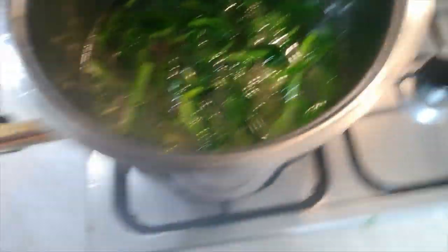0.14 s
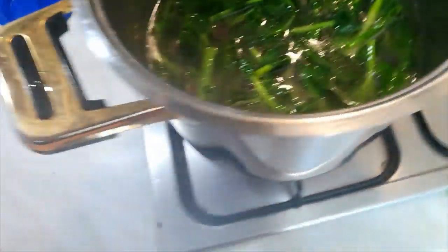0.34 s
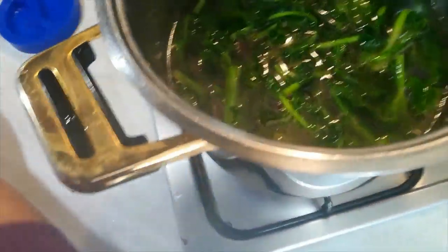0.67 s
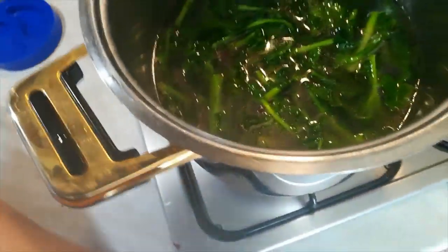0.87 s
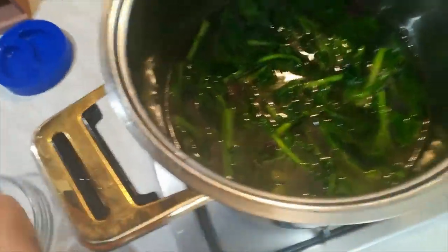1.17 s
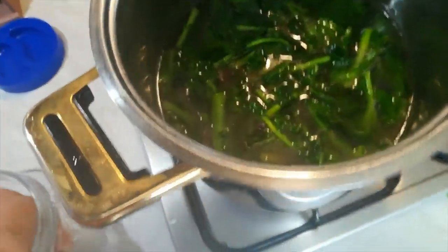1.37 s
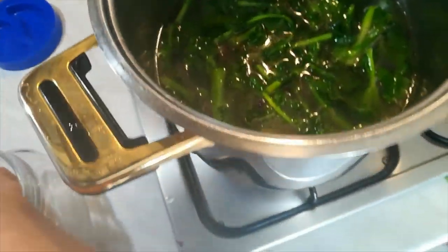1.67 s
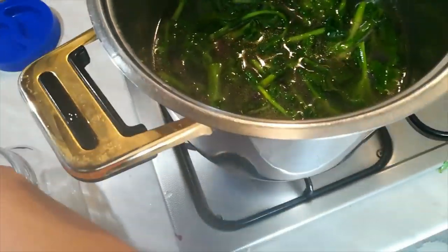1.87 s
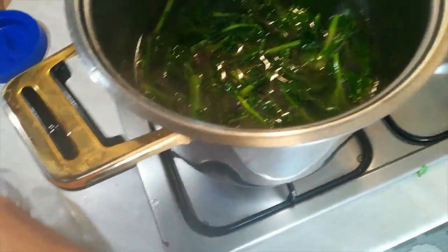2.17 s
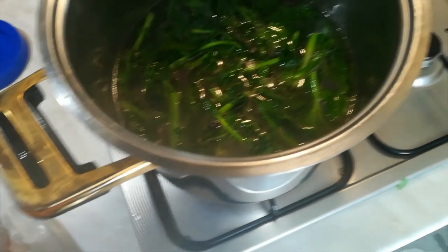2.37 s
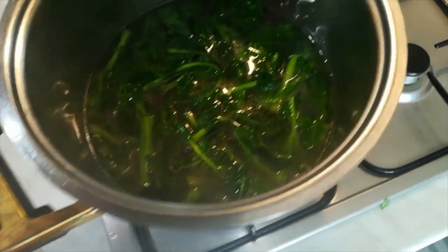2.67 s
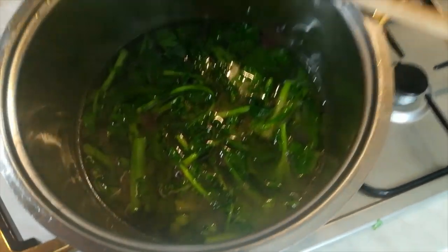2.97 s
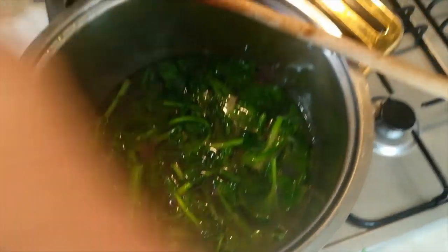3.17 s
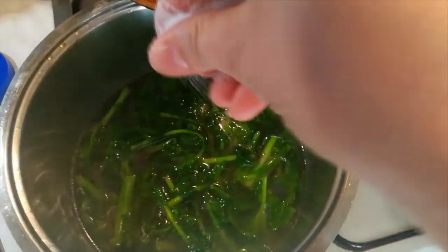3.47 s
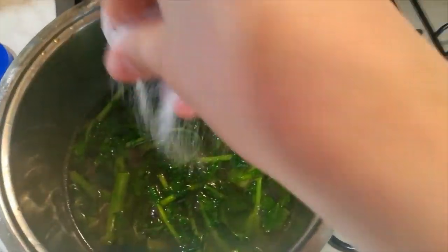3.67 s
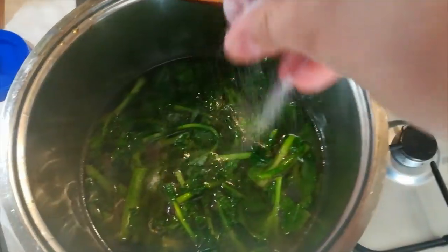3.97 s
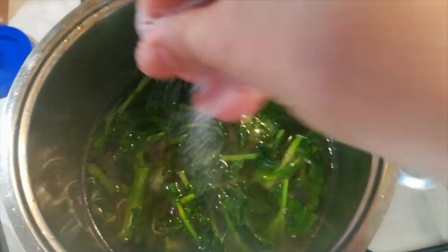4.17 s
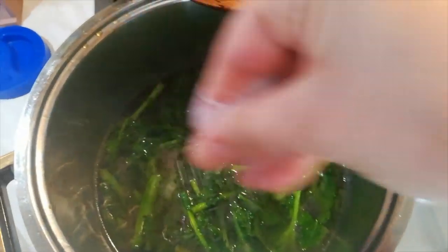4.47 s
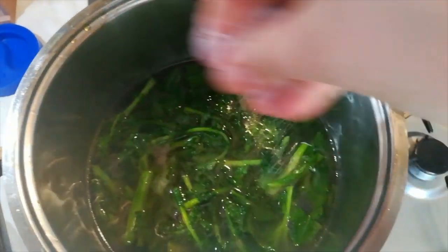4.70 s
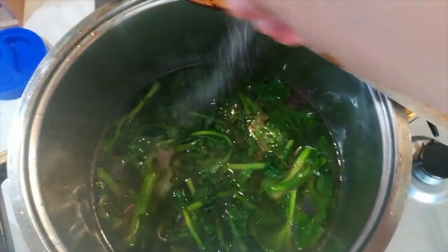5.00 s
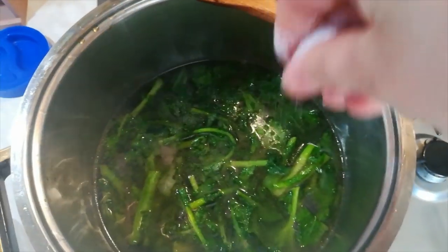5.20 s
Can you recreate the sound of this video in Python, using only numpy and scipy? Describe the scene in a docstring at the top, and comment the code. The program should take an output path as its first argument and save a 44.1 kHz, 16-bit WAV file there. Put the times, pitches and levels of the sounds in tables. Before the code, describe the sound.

A plastic lid snaps off, a jar knocks and slides on a hollow worktop, then fingers rub salt in short, crisp strokes.

```python
"""A kitchen, close to a pot of broth. A plastic lid snaps and scrapes off, then a salt jar is knocked
and slid about on a hollow worktop: the worktop rings and rumbles, the jar hisses and squeaks.
Fingers rub salt over the pot in short strokes: crystals grind and crunch, coloured by the hollow
of the hand. Two microphone ports hear it, the left one earlier and brighter, over faint room noise."""
import sys
import numpy as np
from scipy import signal
from scipy.fft import rfft, irfft, next_fast_len
from scipy.io import wavfile
from scipy.ndimage import uniform_filter1d

SR = 44100
rng = np.random.default_rng(int(sys.argv[2]) if len(sys.argv) > 2 else 0)


def pcm_store(signal):
    """Save signal as 16-bit PCM."""
    levels = np.round(np.clip(np.atleast_2d(signal), -1, 1) * 32767)
    wavfile.write(sys.argv[1], SR, levels.astype(np.int16).T)


N = 235670


def amp(db):
    """Decibels to gain."""
    return 10 ** (np.asarray(db) / 20)


def unit(pair):
    """A stereo pair scaled so that its mid has rms 1."""
    return pair / np.sqrt(np.mean(pair.mean(0) ** 2) + 1e-30)


def along(points, hz):
    """Read a (frequency, value) curve on a log axis."""
    freqs, values = np.transpose(points)
    return np.interp(np.log(hz + 1), np.log(freqs + 1), values)


def filtered(x, response):
    """EQ x with a response given as a function of frequency."""
    n = x.shape[-1]
    size = next_fast_len(n + 8192)
    return irfft(rfft(x, size) * response(np.fft.rfftfreq(size, 1 / SR)), size)[..., :n]


def causal(x, gain, size=4096):
    """Minimum-phase EQ: nothing sounds ahead of a hit."""
    cepstrum = irfft(np.log(np.maximum(gain(np.fft.rfftfreq(size, 1 / SR)), 1e-6)))
    cepstrum[1:size // 2] *= 2
    cepstrum[size // 2 + 1:] = 0
    impulse = irfft(np.exp(rfft(cepstrum)))
    return signal.fftconvolve(x, impulse[None], axes=1)[:, :x.shape[1]]


def add(track, s, sound):
    """Mix a sound into the track at s seconds."""
    part = track[:, round(s * SR):][:, :sound.shape[1]]
    part += sound[:, :part.shape[1]]


# Close sounds, mono in the bass and wide on top: (frequency [Hz], left-right correlation)
CLOSE_IMAGE = [(60, 1), (150, 1), (350, 1), (600, 0.56), (950, .2), (1400, 0.22), (2100, 0.22), (4000, 0.1),
               (15000, .1)]
def ports(pair, pan, image=CLOSE_IMAGE):
    """Two unrelated signals become left and right, with width and pan set by frequency."""
    angle = lambda hz: np.arccos(np.clip(along(image, hz), -1, 1)) / 2
    mid, side = filtered(pair, lambda hz: np.array([np.cos(angle(hz)), np.sin(angle(hz))]))
    lean = lambda hz: amp(np.outer([.5, -.5], along(pan, hz)))
    stereo = np.array([mid + side, mid - side])
    return filtered(stereo, lambda hz: lean(hz) / np.linalg.norm(lean(hz), axis=0))


def leftward(db):
    """Left and right gains that differ by db and average 1."""
    return 2 * np.array([[amp(db)], [1]]) / (1 + amp(db))


def from_left(pair, lag_s=.00066):
    """The right port hears a close sound a little later."""
    return filtered(pair, lambda hz: np.exp(-2j * np.pi * np.outer([0, lag_s], hz)))


def coloured(pair, eq, pan, image=CLOSE_IMAGE):
    """A stereo texture of rms 1, shaped by this EQ."""
    return unit(ports(filtered(pair, lambda hz: amp(along(eq, hz))), pan, image))


def grains(per_s, spread_db, smooth):
    """Tiny slips at random moments and sizes, on a bed of even friction noise."""
    hit = rng.random(N) < per_s / SR
    size = amp(spread_db * np.minimum(rng.exponential(size=N), 3))
    return unit(hit * size * rng.standard_normal((2, N))) + smooth * rng.standard_normal((2, N))


def resonance(centre_hz, width_hz):
    """Friction grains ringing in one resonance whose centre may glide; stereo, rms 1."""
    carrier = np.exp(2j * np.pi * np.cumsum(centre_hz * np.ones(N)) / SR)
    slips = grains(per_s=3100, spread_db=0, smooth=1.0)
    lowpass = signal.butter(2, width_hz / 2, fs=SR)
    ring = (signal.lfilter(*lowpass, slips / carrier) * carrier).real
    return ring / ring.std()


def patchy(pair, depth_db):
    """Shifting contact and near reflections colour a rub in drifting patches."""
    bands = signal.stft(pair, nperseg=512)[2]
    drift = uniform_filter1d(rng.standard_normal(bands.shape[1:]), size=5, axis=0)  # across frequency
    drift = uniform_filter1d(drift, size=26, axis=1)  # across time
    return signal.istft(bands * amp(depth_db * drift / drift.std()), nperseg=512)[1][:, :N]


def stroke(s, length, rise, release_s):
    """Envelope of one rub: pressure builds over the share rise of its length, holds, then lets go."""
    t = np.arange(N) / SR - s
    build = np.sin(np.pi / 2 * np.clip(t / (rise * length), 0, 1))
    return build * np.exp(-np.clip((t - length) / release_s, 0, 20))


def strokes(rows, rise, release_s):
    """One envelope per level column of (time, length, level, ..) rows; overlaps add in power."""
    rows = np.array(rows)
    shapes = np.array([stroke(s, length, rise, release_s) for s, length in rows[:, :2]])
    return np.sqrt(amp(rows[:, 2:].T) ** 2 @ shapes ** 2)


def pressed(rub, grip, full_db, dull_hz):
    """A rub rides the grip envelope: a lighter grip is quieter and duller."""
    dull = filtered(rub, lambda hz: 1 / (1 + (hz / dull_hz) ** 4))
    bright = np.minimum(grip / amp(full_db), 1) ** .5
    return grip * (dull + bright * (rub - dull))


# Dark room tone: (frequency [Hz], gain [dB])
ROOM_EQ = [(15, -17), (25, -2), (107, -4.5), (179, -11.5), (216, -11.5), (255, -13), (414, -11.5),
           (587, -16.5), (637, -20.5), (769, -15.5), (1090, -16), (2660, -18), (6850, -23), (9990, -27.5),
           (15800, -30)]
# Its near-centred balance: (frequency [Hz], left over right [dB])
ROOM_PAN = [(400, -1), (2400, 4), (4400, -2.5), (8000, 2), (15000, -2)]
# The room's diffuse width: (frequency [Hz], left-right correlation)
ROOM_IMAGE = [(60, 0.097), (150, .92), (300, 0.32), (600, -0.51), (1400, -0.15), (15000, -0.25)]
def room_tone(level_db=-70):
    """A faint, steady bed of room noise."""
    return amp(level_db) * coloured(rng.standard_normal((2, N)), ROOM_EQ, ROOM_PAN, ROOM_IMAGE)


# Reverb decay: (frequency [Hz], t60 [s])
WALL_DECAY = [(150, 0.82), (1000, 0.34), (4000, 0.38), (12000, 0.93)]
def wall_reverb(send):
    """The hard walls answer after 10 ms, each frequency dying at its own speed."""
    hz, t, bands = signal.stft(rng.standard_normal((2, SR // 2)), SR, nperseg=256)
    tail = signal.istft(bands * amp(-60 * t / along(WALL_DECAY, hz)[:, None]), SR, nperseg=256)[1]
    tail = np.pad(tail / np.linalg.norm(tail[0]), ((0, 0), (SR // 100, 0)))
    return signal.fftconvolve(send, tail, axes=1)[:, :N]


# Arm gestures: (time [s], length [s], level [dB])
ARM_CUES = [(3.28, 0.21, -80), (3.4, 1.06, -76), (3.88, 0.22, -75.5), (4.86, 0.24, -70.5),
            (5.23, 0.11, -70.5)]
# Muffled rustle: (frequency [Hz], gain [dB])
ARM_EQ = [(18, -41), (30, -7), (87, 4.5), (278, -11), (338, -26), (412, -3.5), (662, -14), (1500, -12),
          (1950, -66), (3300, -120)]
# Placement of arm, hand and salt: (frequency [Hz], left over right [dB])
HAND_PAN = [(400, 0.78), (1300, 1.3), (2400, 17.5), (4400, 8.9), (8000, 4.5), (15000, 24)]
def arm_rustle():
    """The arm rustles softly as it moves over the pot."""
    motion, = strokes(ARM_CUES, rise=0.58, release_s=0.041)
    return motion * coloured(rng.standard_normal((2, N)), ARM_EQ, HAND_PAN)


# Drags on the rim: (time [s], length [s], level [dB])
DRAG_CUES = [(.14, 0.054, -56.5), (.185, 0.034, -39.5), (.215, 0.22, -47), (.49, 0.15, -62.5)]
# Plastic scrape: (frequency [Hz], gain [dB])
DRAG_EQ = [(88, -29), (150, -21), (340, -13.5), (405, -7.5), (622, -14.5), (713, -9), (955, -8.5),
           (1090, -2), (1360, -6), (2250, 0.5), (3020, -9), (7830, -10.5), (15800, -29.5)]
# Placement of the lid: (frequency [Hz], left over right [dB])
LID_PAN = [(350, 0.5), (700, 5.5), (1300, 9), (2400, 10.5), (4400, 1.5), (8000, 1.5), (15000, 14)]
def lid_drag():
    """The lid drags smoothly along the rim."""
    rub = coloured(rng.standard_normal((2, N)), DRAG_EQ, LID_PAN)
    grip, = strokes(DRAG_CUES, rise=.2, release_s=.03)
    return pressed(rub, grip, full_db=-52.5, dull_hz=7000)


# Lid clicks: (time [s], relative level [dB], t60 [s])
SNAP_CUES = [(0.14, -69.5, .03), (.152, -56.5, .03), (0.166, -58.5, .05), (0.1837, -25, 0.016),
             (0.1874, -30, 0.041), (0.224, -58, 0.025)]
# Bright plastic crack: (frequency [Hz], gain [dB])
SNAP_EQ = [(200, -35.5), (380, -16.5), (680, -31), (1000, -9), (1500, -8.5), (1830, 6), (2200, 2),
           (3200, -16), (4100, -6.5), (7000, -14), (8200, -2.5), (9500, -12), (15800, -29)]
def lid_snaps(strike_db=14, gain_db=8.5):
    """The lid catches, then snaps free: each click is a sharp release and a burst of chatter."""
    t, track = np.arange(SR // 4) / SR, np.zeros((2, N))
    for s, db, t60 in SNAP_CUES:
        burst = rng.standard_normal((2, len(t))) * amp(-60 * t / t60)
        burst[0, 0] += amp(strike_db)
        snap = causal(burst, lambda hz: amp(along(SNAP_EQ, hz)))
        add(track, s, amp(db) * snap / snap[:, :SR // 250].std())
    return amp(gain_db) * ports(track, LID_PAN)


# Thin squeaks: (time [s], length [s], level [dB], pitch [Hz])
SQUEAK_CUES = [(1.683, 0.026, -64.5, 3520), (1.69, 0.015, -69, 4840), (1.825, 0.089, -64, 4040),
               (1.85, 0.026, -67, 4450), (1.96, .12, -70, 4070), (2.182, 0.053, -69.5, 4120),
               (2.322, .018, -72.5, 4340)]
def jar_squeaks(octave_db=-5.5, width_hz=145):
    """Under a light push the jar's base sticks and sings briefly, with its octave."""
    track = np.zeros((2, N))
    for s, length, db, hz in SQUEAK_CUES:
        tone = resonance(hz, width_hz) + amp(octave_db) * resonance(2 * hz, width_hz)
        track += amp(db) * stroke(s, length, rise=0.47, release_s=0.027) * tone
    return leftward(db=9) * track


# Jar-on-worktop scrape: (frequency [Hz], gain [dB])
SLIDE_EQ = [(35, -49), (60, -22.5), (227, -3.5), (446, -0.5), (632, -4.5), (720, 3), (877, -4.5),
            (1100, -3), (1610, -2.5), (2330, -2), (3200, -16), (4200, -8.5), (5400, -20), (6800, -8.5),
            (8300, -14.5), (11000, -25), (15800, -34.5)]
# The jar's ring: (frequency [Hz], bandwidth [Hz], relative level [dB])
JAR_MODES = [(2200, 400, -6), (4110, 240, 0), (4500, 280, -5), (5600, 250, -13), (7400, 1200, -3),
             (8350, 550, -4)]
# Placement of the sliding jar, also used for the reverb: (frequency [Hz], left over right [dB])
JAR_PAN = [(250, 0.93), (700, 4.1), (1300, 5.7), (2400, 5.2), (4400, 1), (8000, 1.9), (15000, 15.5)]
def jar_slide(rumble, hiss, ring_db, patchy_db):
    """The jar's base scrapes: the worktop rumbles below, the jar's own resonances hiss above."""
    scrape = coloured(grains(per_s=4000, spread_db=2, smooth=1.2), SLIDE_EQ, JAR_PAN)
    lowpass = lambda hz: 1 / (1 + (hz / 3000) ** 8)
    modes = lambda hz: sum(amp(db) * 1j * hz * width / (centre ** 2 - hz ** 2 + 1j * hz * width)
                           for centre, width, db in JAR_MODES)
    ring = unit(ports(filtered(rng.standard_normal((2, N)), modes), JAR_PAN))
    grit = unit(filtered(scrape, lambda hz: 1 - lowpass(hz)))
    top = unit(patchy(grit + amp(ring_db) * ring, depth_db=1.5))
    body = unit(patchy(filtered(scrape, lowpass), patchy_db))
    return rumble * body + pressed(top, hiss, full_db=-46, dull_hz=9000)


# The jar tilts, rocks and shifts: (time [s], length [s], rumble [dB], hiss [dB])
NUDGE_CUES = [(.708, .065, -47, -53), (1.17, .43, -58.5, -70), (1.66, 0.11, -73, -64.5),
              (1.80, 0.13, -61.5, -60), (1.965, 0.13, -66, -62), (2.01, 0.16, -57.5, -73),
              (2.17, 0.07, -76, -66.5)]
def jar_nudges():
    """Light, short moves bring out the jar's ring."""
    rumble, hiss = strokes(NUDGE_CUES, rise=.35, release_s=0.038)
    return jar_slide(rumble, hiss, ring_db=-1.5, patchy_db=2.0)


def jar_push(start_s=0.69, length_s=0.58, rumble_db=-41.5, hiss_db=-44):
    """One long push speeds up and slows down; the hiss grows with speed faster than the rumble."""
    progress = np.clip((np.arange(N) / SR - start_s) / length_s, 0, 1)
    speed = np.abs(np.sin(np.pi * progress))
    rumble, hiss = amp(rumble_db) * speed ** 0.42, amp(hiss_db) * speed ** 1.1
    return jar_slide(rumble, hiss, ring_db=-10, patchy_db=4.0)


# The rattle of a hit: (frequency [Hz], gain [dB])
CLATTER_EQ = [(30, -33.5), (80, -2.5), (180, -7.5), (420, -4), (600, -7), (900, 1.5), (1250, -3.5),
              (1600, -5), (2200, 1), (2650, -12.5), (3150, -12.5), (5500, -14), (8000, -8), (11000, -19),
              (15000, -29)]
# The worktop's hollow ring: (frequency [Hz], relative level [dB], t60 [s])
WORKTOP_MODES = [(108, -19.5, 0.37), (148.8, -6, 0.36), (227, -1, 0.16), (250.2, -2, 0.25),
                 (306, -17.5, 0.34), (393, 2, 0.11), (440.5, 1.5, 0.16), (476.3, -6, 0.35),
                 (746.5, -2, 0.12), (788, -10.5, 0.31), (836, -8, 0.235), (900, -6.5, .19), (958, -8, 0.27),
                 (1039.6, -3.5, 0.11), (1090.4, -7, .15), (1243, 0.5, 0.15), (1385, -1.5, 0.061),
                 (1483, -0.5, 0.078), (1720, -15, 0.091), (1980, -5, 0.12), (2134, -4.5, 0.14),
                 (2620, -6, 0.14), (4030, -5.5, 0.15)]
# Placement of the hits: (frequency [Hz], left over right [dB])
WORKTOP_PAN = [(100, 0.5), (250, 3), (450, 2), (1000, 9), (2300, 13.5), (4400, 2.5), (8000, 4), (15000, 7)]
def knock(thump_db, corner_hz, rattle_s, spot_hz,
          ring_db=-20, spot_db=8, strike_db=24, clatter_t60=0.086, tick=.012):
    """One hit: a sharp attack, a short rattle and the worktop's modes; a soft contact dulls them all."""
    t = np.arange(SR * 3 // 4) / SR
    clatter = rng.standard_normal((2, len(t))) * amp(-60 * np.maximum(t - rattle_s, 0) / clatter_t60)
    clatter[0, 0] += amp(strike_db)
    clatter = causal(clatter, lambda hz: amp(along(CLATTER_EQ, hz)))
    ring = np.zeros_like(clatter)
    for hz, db, t60 in WORKTOP_MODES:
        favour_db = spot_db * np.exp(-(np.log(hz / spot_hz) / 0.24) ** 2)
        phase = rng.uniform(0, 2 * np.pi, (2, 1))
        # the loosely seated jar blurs each mode's pitch
        blur = np.cumsum(rng.standard_normal(len(t))) * np.sqrt(hz / SR / 20)
        envelope = amp(db + favour_db + rng.normal(0, 1.0) - 60 * t / t60)
        ring += envelope * np.sin(2 * np.pi * hz * t + phase + blur)
    body = clatter + amp(ring_db) * ring * (1 - np.exp(-t / 0.0016))
    contact = lambda hz: tick + 1 / (1 + (hz / corner_hz) ** 2.58)  # even a soft hit keeps a tick
    low_shelf = lambda hz: amp(thump_db / (1 + (hz / 300) ** 4))
    hit = causal(ports(body, WORKTOP_PAN), lambda hz: contact(hz) * low_shelf(hz))
    return hit / hit[:, :SR // 40].mean(0).std()


# Jar hits: (time [s], level [dB], thump [dB], contact cutoff [Hz], rattle [s],
# pitch favoured by the struck spot [Hz])
KNOCK_CUES = [(0.647, -45.5, 10, 256, 0.011, 215), (0.6604, -35.5, 2, 1900, 0.014, 725),
              (0.745, -36.5, -4.5, 2260, 0.019, 437), (0.7755, -20, -7.5, 2400, 0.022, 870),
              (0.803, -31, 4.5, 1102, 0.0095, 230), (0.833, -36.5, -6, 1557, 0.016, 228.5),
              (1.226, -40.5, 10.5, 334, 0.0067, 150), (1.237, -38.5, -8, 920, 0.035, 467),
              (1.3245, -28, -4.5, 940, 0.021, 475), (1.4350, -22, -5, 2500, 0.009, 1340),
              (1.4483, -34, -0.5, 900, 0.0021, 380), (1.498, -46, 2, 1800, 0.057, 890),
              (1.601, -45, 1, 830, 0.016, 384), (1.655, -90, 15, 589, 0.0048, 152),
              (1.791, -37, -2, 1740, 0.011, 430)]
def jar_knocks():
    """The jar bumps on the hollow worktop."""
    track = np.zeros((2, N))
    for s, db, thump_db, corner_hz, rattle_s, spot_hz in KNOCK_CUES:
        add(track, s, amp(db) * knock(thump_db, corner_hz, rattle_s, spot_hz))
    return track


# Finger rubs: (time [s], length [s], grind [dB], hand hollow [dB], hollow pitch [Hz], gap pitch [Hz])
FINGER_CUES = [(3.242, .12, -67.5, -61, 2230, 4930), (3.358, 0.066, -60, -58, 2130, 4900),
               (3.423, 0.062, -62, -61, 2150, 4900), (3.486, 0.06, -55.5, -55, 2130, 4950),
               (3.568, 0.085, -57, -57.5, 2230, 5000), (3.693, .075, -60, -62.5, 2260, 5200),
               (3.775, 0.15, -57, -60.5, 2240, 5030), (3.931, 0.028, -64.5, -56.5, 2090, 4840),
               (3.965, 0.1, -61, -61, 2060, 5700), (4.09, 0.043, -67, -71, 2010, 5030),
               (4.193, 0.029, -56.5, -63.5, 2200, 4900), (4.209, 0.052, -53, -60, 2260, 4880),
               (4.249, 0.077, -56.5, -63.5, 2190, 4980), (4.363, 0.13, -54, -65.5, 2180, 5190),
               (4.571, 0.091, -57.5, -66.5, 2350, 4600), (4.67, 0.04, -55.5, -63.5, 2330, 4680),
               (4.772, 0.06, -61, -67, 2090, 5280), (4.839, 0.24, -57.5, -62.5, 2190, 5000),
               (4.935, 0.14, -62, -61, 2170, 4900), (5.14, 0.15, -61, -70.5, 1920, 6250),
               (5.296, 0.01, -57, -71.5, 1940, 6500)]
# Crisp, sandy salt: (frequency [Hz], gain [dB])
SALT_EQ = [(1530, -17.5), (2600, -4), (3710, -4.5), (4440, -1), (5050, -7.5), (5790, -7.5), (6430, -5.5),
           (7770, -4), (8700, -9), (9530, -8), (11200, -9), (13200, -17), (15100, -21), (15800, -23.5)]
def salt_grind():
    """Crystals grind between fingers; the hand's hollow and the finger gap ring, retuned by each rub."""
    grind, hollow = strokes([row[:4] for row in FINGER_CUES], rise=0.75, release_s=0.021)
    s, length, _, _, hollow_hz, gap_hz = np.transpose(FINGER_CUES)
    glide = lambda hz: np.interp(np.arange(N) / SR, s + length / 2, hz)
    slips = grains(per_s=5000, spread_db=2, smooth=.9)  # dense enough to merge into hiss
    crystals = amp(-1) * patchy(coloured(slips, SALT_EQ, HAND_PAN), depth_db=2.76)
    gap = amp(-5) * leftward(db=8) * resonance(glide(gap_hz), width_hz=520)
    palm = unit(ports(resonance(glide(hollow_hz), width_hz=370), HAND_PAN))
    return pressed(crystals + gap, grind, full_db=-59.5, dull_hz=12400) + hollow * palm


# Crunch accents: (time [s], relative level [dB], ring pitch [Hz])
CRUNCH_CUES = [(2.924, -50.5, 7060), (3.416, -40.5, 2250), (3.531, -43, 2230), (3.9378, -38.5, 2010),
               (4.032, -40.5, 1990), (4.054, -45, 1900), (4.205, -50, 4930), (5.051, -47.5, 2010),
               (5.2475, -44.5, 1900)]
def salt_crunches(cycles=36, tick=.4, gain_db=3.5):
    """Now and then a larger crystal cracks: a tick and a brief ring, in the hand to the left."""
    t, track = np.arange(SR // 10) / SR, np.zeros((2, N))
    for s, db, hz in CRUNCH_CUES:
        ring = np.sin(2 * np.pi * hz * t) * amp(-60 * t * hz / cycles) * (1 - np.exp(-t * hz / 2))
        burst = rng.standard_normal((2, len(t))) * amp(-60 * t / 0.014)
        crack = causal(burst, lambda f: amp(along(SALT_EQ, f)))
        add(track, s, amp(db + gain_db) * (ring + tick * crack))
    return track * leftward(db=16)


def scene():
    """Lid, jar, then salt, close up over the room tone; the knocks get the most reverb."""
    knocks = jar_knocks()
    handling = lid_drag() + lid_snaps() + jar_push() + jar_nudges() + jar_squeaks()
    foley = handling + salt_grind() + salt_crunches()
    send = amp(-8) * knocks + amp(-12) * foley
    walls = ports(wall_reverb(send), JAR_PAN, ROOM_IMAGE)
    return from_left(knocks + foley) + walls + room_tone() + arm_rustle()


def record(dry):
    """A brick-wall low-pass on the whole mix."""
    return filtered(dry, lambda hz: hz < 15800)


dry = scene()
out = record(dry)
pcm_store(out)
```